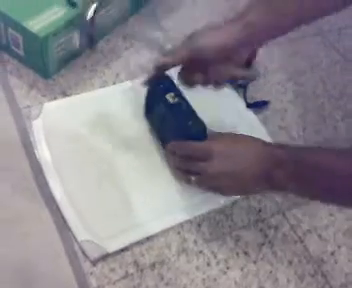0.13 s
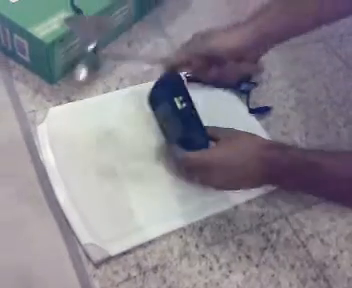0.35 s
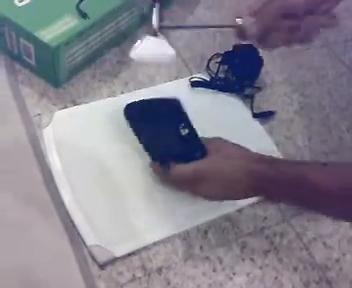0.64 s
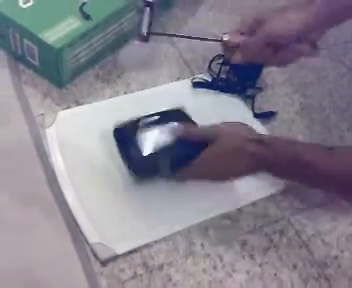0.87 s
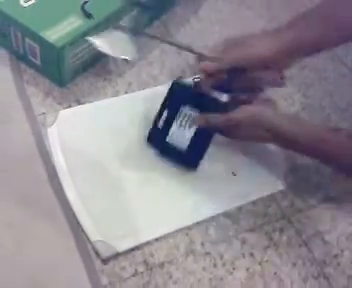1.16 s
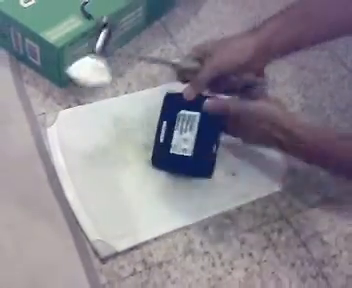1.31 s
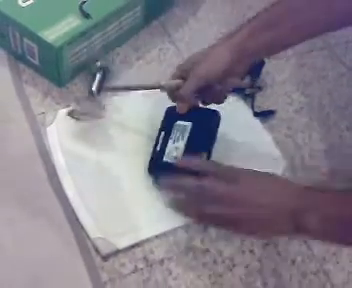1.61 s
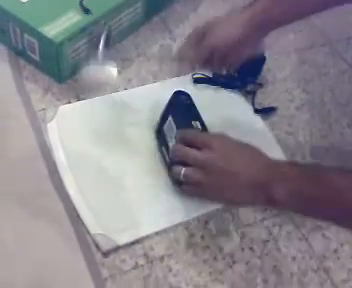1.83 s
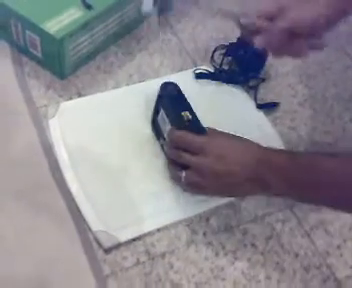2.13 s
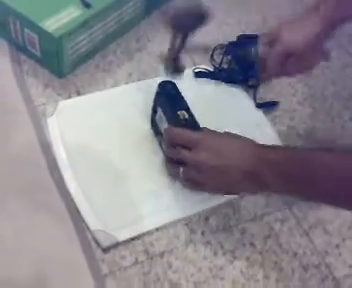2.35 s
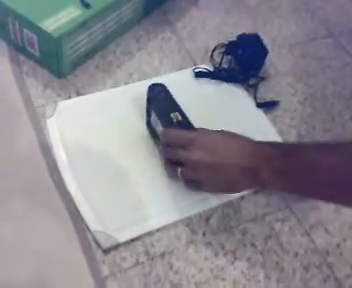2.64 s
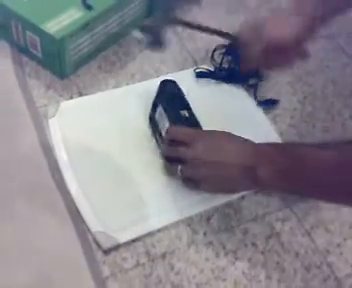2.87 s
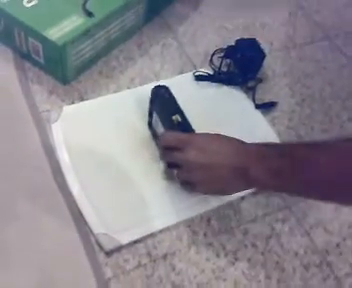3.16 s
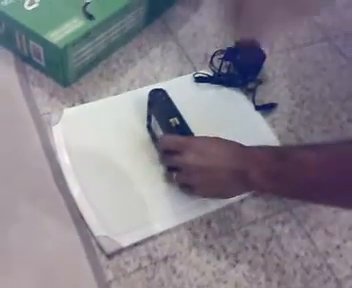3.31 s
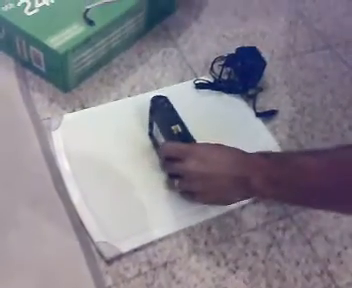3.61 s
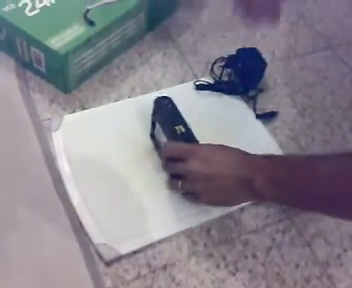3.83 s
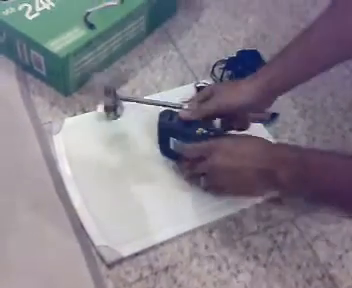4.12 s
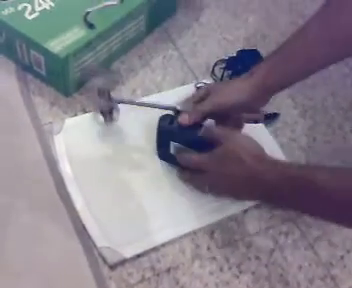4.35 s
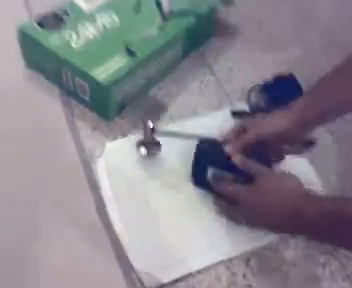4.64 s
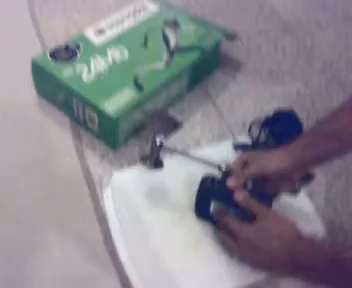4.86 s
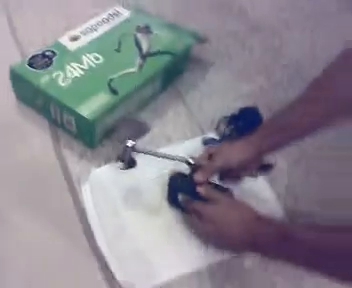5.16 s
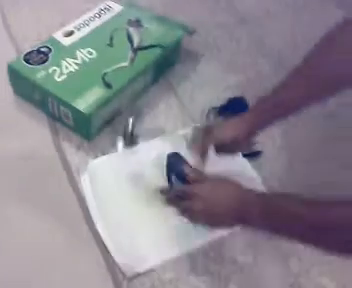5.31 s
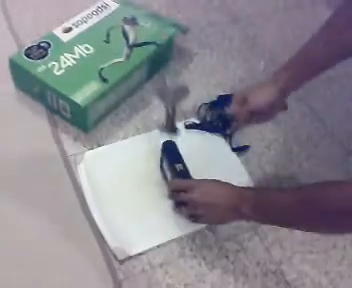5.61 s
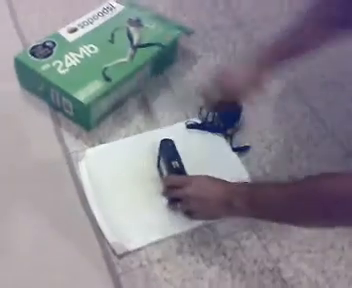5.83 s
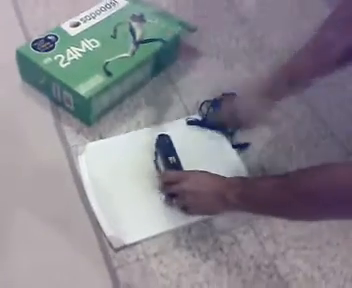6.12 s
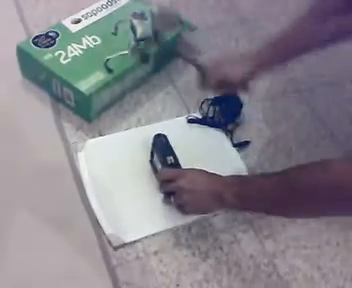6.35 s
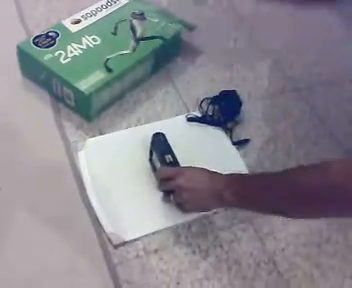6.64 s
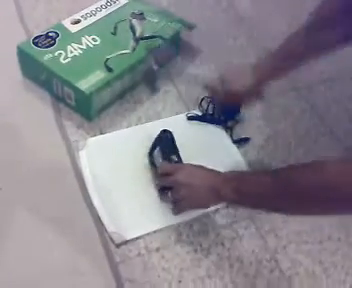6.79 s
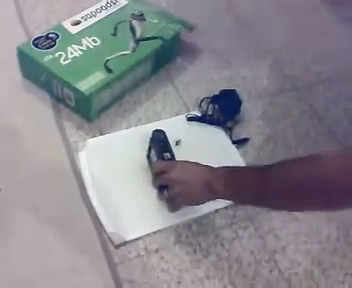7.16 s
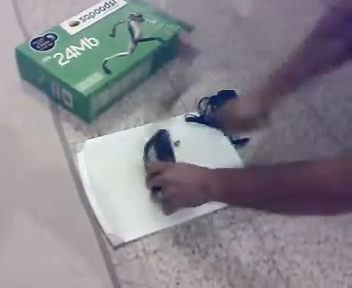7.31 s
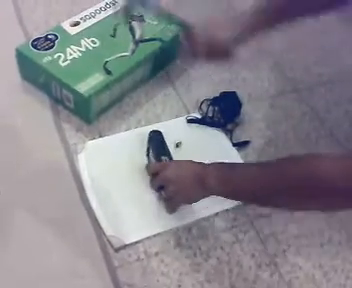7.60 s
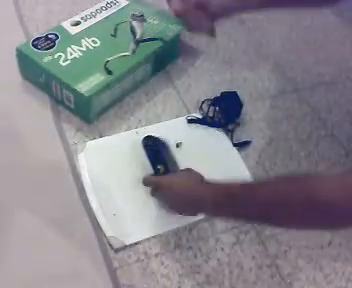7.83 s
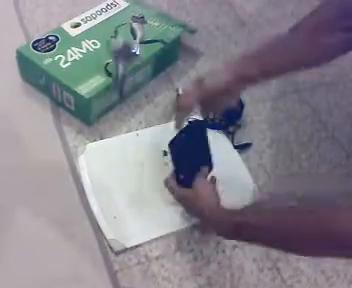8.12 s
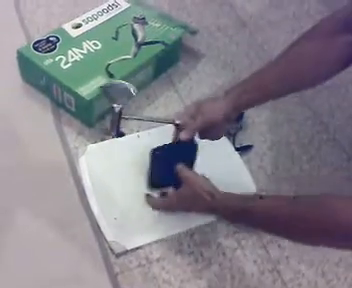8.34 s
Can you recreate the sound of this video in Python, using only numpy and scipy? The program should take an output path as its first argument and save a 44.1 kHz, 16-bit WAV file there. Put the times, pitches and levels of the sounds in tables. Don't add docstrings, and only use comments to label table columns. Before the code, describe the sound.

Hard hammer blows crack a hollow plastic case on a tiled floor, with knocks, ticks and sliding between, in an echoing bare room.

```python
import sys
import numpy as np
from scipy import signal
from scipy.fft import rfft, irfft
from scipy.io import wavfile
from scipy.ndimage import uniform_filter1d

SR = 44100
rng = np.random.default_rng(int(sys.argv[2]) if len(sys.argv) > 2 else 0)


def invert_db(level):
    return 10 ** (np.asarray(level, dtype=float) / 20)


def inscribe(sig):
    pcm = np.round(np.clip(np.atleast_2d(sig).T, -1, 1) * 32767)
    wavfile.write(sys.argv[1], SR, pcm.astype(np.int16))


N = 373527
LEAD = 11025
LOW_RATE = 16000


def evened(x):
    return x / np.sqrt(np.mean(x ** 2) + 1e-20)


def read(points, hz):
    f, value = np.transpose(points)
    return np.interp(np.log(hz + 1), np.log(f + 1), value)


def shaped(colour, grain):
    gain = invert_db(read(colour, np.fft.rfftfreq(len(grain), 1 / SR)))
    return evened(irfft(rfft(grain) * gain, len(grain)))


def causal(db):
    log_gain = np.log(invert_db(np.concatenate([db, db[-2:0:-1]])))
    return np.fft.ifft(np.exp(signal.hilbert(log_gain).conj())).real[:len(db)]


def add(mix, start_s, sound):
    part = mix[LEAD + round(start_s * SR):][:len(sound)]
    part += sound[:len(part)]


def hump(hz, centre_hz, width_hz):
    return 1 / (1 + ((hz - centre_hz) / (width_hz / 2)) ** 2)


def rings(hz, ring_hz, width_hz):
    return sum(share * hump(hz, f, width_hz) for share, f in zip((1, 0.76), ring_hz))


def contact(level_db, thud_db, crack_db, echo_db, chance, body_db, contact_s):
    hz = np.fft.rfftfreq(4096, 1 / SR)
    tilt_db = read([(1000, thud_db), (1300, 0.0036), (3000, 0.015), (4500, crack_db)], hz)
    snap, shell = causal(tilt_db + 1.05 * body_db), causal(tilt_db + body_db)
    t = np.arange(len(chance)) / SR
    attack = np.minimum(t / 0.00081, 1)
    clatter = chance * attack * np.exp(-(t / contact_s) ** 2)
    direct = signal.fftconvolve(clatter, snap)
    direct = invert_db(level_db) * direct / np.linalg.norm(direct)
    return direct, invert_db(level_db + echo_db) * shell / np.linalg.norm(shell)


def play(close, feed, rows, body, thud_db, echo_db, contact_s, lift_db=0):
    for start_s, level_db, crack_db, *ring_hz in rows:
        chance = rng.standard_normal(1600)
        body_db = body(ring_hz, chance)
        direct, spread = contact(level_db + lift_db, thud_db, crack_db, echo_db, chance, body_db, contact_s)
        add(close, start_s, direct)
        add(feed, start_s, spread)


# [freq_hz, density_db_per_hz]
BLOW_COLOUR = [(30, -42.5), (100, -15), (250, -14), (550, -12.5), (950, -5), (1400, -6), (1900, -4.5),
               (2300, -9.5), (3150, -7.5), (3750, -13), (4600, -8.5), (6400, -9.5), (7400, -8),
               (8200, -29.5)]


def crash(ring_hz, chance):
    hz = np.fft.rfftfreq(4096, 1 / SR)
    return read(BLOW_COLOUR, hz) + 10 * np.log10(1 + 2.1 * rings(hz, ring_hz, 220))


def thump(phase):
    pitch_hz, t60_s = 93.6, .25
    t = np.arange(SR // 4) / SR
    boom = np.sin(2 * np.pi * pitch_hz * t)
    boom += 0.95 * np.sin(2 * np.pi * 1.3 * pitch_hz * t + phase)
    boom += 0.55 * np.sin(2 * np.pi * .4 * pitch_hz * t)
    return invert_db(-17 - 60 * t / t60_s) * boom


# [start_s, level_db, crack_db, ring_hz, second_ring_hz]
BLOWS = [
    (-.19, 27, 3, 1550, 3170),
    (3.0677, 21.5, 1.5, 1860, 1930),
    (3.5815, 20.5, 3.5, 1335, 1830),
    (6.421, 20, 1.2, 1804, 1390),
    (6.988, 19.5, 1, 1320, 1940),
    (7.541, 21, 0.3, 3120, 1570),
]


def blows(close, feed):
    play(close, feed, BLOWS, crash, thud_db=-1.8, echo_db=6.34, contact_s=0.0076)
    crush_db_per_s = 1.65
    for start_s, *_ in BLOWS:
        add(close, start_s, invert_db(-crush_db_per_s * start_s) * thump(rng.uniform(0, 2 * np.pi)))


# [freq_hz, width_hz, level_db]
CASE = [(700, 120, -5), (970, 90, 3), (1370, 90, -3), (1620, 90, -5), (1850, 120, -1), (2900, 200, -7),
        (3250, 150, -6), (4700, 300, -9), (6300, 400, -8)]


def hollow(ring_hz, chance):
    hz = np.fft.rfftfreq(4096, 1 / SR)
    modes = sum(invert_db(2 * db + 2 * c) * hump(hz, f, width) for (f, width, db), c in zip(CASE, chance))
    loudest = 7.5 * rings(hz, ring_hz, 61)
    return 10 * np.log10(.1 + modes + loudest) + read([(100, -16.0), (500, -4), (7000, -3)], hz)


# [start_s, level_db, crack_db, ring_hz, second_ring_hz]
KNOCKS = [(.988, -43, -8, 330, 700), (1.1848, -11, -6.5, 963, 1720), (1.8332, -20.5, -7, 1020, 1980),
          (1.9197, -15.5, -8, 960, 1390), (1.948, -16.5, -13, 1974, 2760), (2.1168, -1.5, -9.5, 961, 1390),
          (2.6603, -3.5, -2.5, 1896, 1680), (4.2015, -30.5, -18, 990, 1860), (4.304, -16, 8, 1790, 1400),
          (4.311, -8.5, -4.5, 956, 1640), (4.3185, -9, -13, 984, 1665), (5.0306, -24, -8, 1820, 1220),
          (5.0657, -11, -0.5, 1580, 997), (5.3938, -31, 0, 710, 3180), (8.2545, -31.5, 3, 934, 1800)]


def knocks(close, feed):
    play(close, feed, KNOCKS, hollow, thud_db=.4, echo_db=-5, contact_s=0.0051, lift_db=13)


# [start_s, level_db, crack_db, ring_hz]
TICKS = [(.7348, -41.5, -24, 1900), (1.1483, -21, -2.5, 2800), (1.2076, -18, -12, 1750),
         (1.2407, -8.5, -2, 1770), (1.4271, -20, -13, 1724), (1.4600, -25, -18, 1800),
         (1.4935, -32.5, -5, 1780), (1.5512, -23.5, -13, 1700), (1.5742, -19.5, -11, 1790),
         (1.6232, -19.5, -8, 1780), (1.7065, -26.5, -11, 1720), (1.8584, -26, -1.5, 1930),
         (2.0304, -38, 2, 950), (4.844, -45, -29, 1820), (5.4251, -34.5, -25, 1800),
         (5.4895, -35, -9, 1820), (5.7993, -38, -25, 1750), (5.859, -35.5, 9, 1850), (5.99, -24.5, 2, 1790),
         (8.1943, -35.5, -7, 1940), (8.352, -36, -3.5, 1820), (8.3946, -36.5, 9, 1850),
         (8.4204, -37.5, 18, 1830), (8.4454, -35, 10, 1830), (8.3337, -39, 14, 1400),
         (8.378, -40, -4, 1830)]


def ticks(close, feed):
    play(close, feed, TICKS, hollow, thud_db=-15, echo_db=-4.5, contact_s=0.0071, lift_db=13)


# [start_s, level_db, crack_db, ring_hz]
SCUFFS = [(2.3694, -35, -7.5, 969), (3.9685, -12, -1, 1320), (4.2278, -30.5, -2, 1900),
          (4.2500, -25.5, -19, 970), (4.2750, -24.5, -5, 1020), (4.3894, -28, 4, 970),
          (4.7144, -34.5, -15, 1241), (5.6808, -38, -26, 1000), (5.7150, -38.5, -30, 824),
          (5.7492, -38.5, -10, 810), (5.9397, -12.5, 0.5, 1806), (5.9703, -18, 1.5, 1810)]


def scuffs(close, feed):
    play(close, feed, SCUFFS, hollow, thud_db=-1.1, echo_db=1.3, contact_s=0.0091, lift_db=13)


# [start_s, level_db, crack_db, ring_hz, second_ring_hz]
SHARD = [
    (7.9837, -1, -6.5, 1850, 1480),
]


def shard(close, feed):
    play(close, feed, SHARD, crash, thud_db=-6.5, echo_db=-4, contact_s=0.0053)


# [freq_hz, level_db, t60_s]
STEEL = [(615, -11, .08), (721, -11, .08), (1090, -10, .08), (1320, -7, .07), (3250, -10, .03),
         (4150, -1, .02), (4760, -2, .04), (6300, -2.5, .03)]


def steel(close, feed):
    t = np.arange(SR // 2) / SR
    song = sum(invert_db(db - 60 * t / t60_s) * np.sin(2 * np.pi * hz * t) for hz, db, t60_s in STEEL)
    for mix in (close, feed):
        add(mix, 3.968, invert_db(-23) * song)


# [start_s, length_s, level_db]
SLIDE = [(0.944, 0.11, -55.5), (1.2, 0.49, -51), (1.82, 0.35, -48.5), (2.4, 0.41, -53),
         (2.751, 0.41, -45.5), (4.14, 0.47, -45), (4.41, 0.58, -49.5), (5.346, 0.36, -51.5),
         (5.57, .45, -48.5), (6.079, 0.52, -51.5), (8.066, .35, -57)]
# [freq_hz, density_db_per_hz]
SLIDE_COLOUR = [(88, -24), (150, -4.5), (471, -5), (575, 1.5), (1610, -2), (1840, 0.5), (3500, -32),
                (3680, -18.5), (6370, -13.5), (7900, -68), (10300, -61), (17400, -120)]


def slide():
    slips_per_s, peak_share = 3000, 0.29
    size = invert_db(2.6 * np.minimum(rng.exponential(1, N), 3))
    slips = rng.standard_normal(N) * size * (rng.random(N) < slips_per_s / SR)
    clumps = invert_db(1.4 * evened(uniform_filter1d(rng.standard_normal(N), size=1200)))
    t = np.arange(N) / SR
    level = 0
    for start_s, length_s, level_db in SLIDE:
        corners_s = [start_s, start_s + peak_share * length_s, start_s + length_s]
        level = level + invert_db(level_db) * np.interp(t, corners_s, [0, 1, 0])
    return level * clumps * shaped(SLIDE_COLOUR, slips)


# [freq_hz, t60_s]
ROOM = [(120, 0.64), (400, 0.61), (1000, 0.65), (2000, 0.64), (4000, 0.55), (7500, 0.49)]
# [freq_hz, gain_db]
HOUSING = [(200, -1), (1000, -1), (1900, 1), (3200, 0.5), (5000, -2), (7500, -1.5)]


def room(x, count=3):
    turn, wet = np.arange(len(x)) / SR * 1.3, 0
    at = np.arange(300, SR - 22, 22)
    for k in range(count):
        taps = np.zeros(SR)
        taps[at + rng.integers(0, 22, len(at))] = rng.choice([-1., 1.], len(at))
        hz, t, z = signal.stft(taps, SR, nperseg=256)
        decay = invert_db(-60 * t / read(ROOM, hz)[:, None])
        tail = signal.istft(z * decay, SR, nperseg=256)[1]
        tail *= np.minimum(np.arange(len(tail)) / SR / 0.012, 1)
        share = np.cos(np.pi * (turn - k / count))
        wet = wet + signal.fftconvolve(x * share, tail / np.linalg.norm(tail))[:len(x)]
    housing = causal(read(HOUSING, np.fft.rfftfreq(2048, 1 / SR)))
    return signal.fftconvolve(wet, housing)[:len(x)]


# [centre_s, half_length_s, swell_db]
PASSES = [
    (2.5, 0.97, 6),
    (4.1, .4, 1),
    (5.9, 0.62, 8),
]


def traffic():
    t = np.arange(N) / SR
    colour = [(15, -5.5), (60, -1.5), (150, -6.0), (300, 0.5), (450, -14), (900, -36.5)]
    dull = shaped(colour, rng.standard_normal(N))
    swell_db = sum(db * np.exp(-((t - s) / half_s) ** 2) for s, half_s, db in PASSES)
    return invert_db(-60 + swell_db) * dull


# [start_s, length_s, pitch_hz, level_db]
DRONES = [
    (.1, 1.9, 88, -60.5),
    (2.0, 0.95, 86, -62.5),
    (3.797, 2.4, 92, -62),
    (5.297, 1.1, 66, -58.5),
]


def drones():
    t = np.arange(N) / SR
    waver = 1 + 0.48 * evened(uniform_filter1d(rng.standard_normal(N), size=6000))
    out = 0
    for start_s, length_s, pitch_hz, level_db in DRONES:
        arch = np.sin(np.pi * np.clip((t - start_s) / length_s, 0, 1)).clip(0)
        out = out + invert_db(level_db) * np.sqrt(arch) * waver * np.sin(2 * np.pi * pitch_hz * t)
    return out


# [freq_hz, density_db_per_hz]
HUSH = [(250, -29.5), (400, -2.5), (1400, -8), (1750, -3.5), (2300, -11), (3500, -18.5), (5000, -20),
        (7000, -23.5), (7900, -29)]


def hush():
    return invert_db(-60.5) * shaped(HUSH, rng.standard_normal(N))


# [pitch_hz, rms_level_db]
WHINE = [(1685, -76), (3225, -79), (3515, -76), (3731, -89), (4102, -85), (4393, -87), (4980, -85),
         (5276, -81), (5566, -85), (6153, -87), (6444, -92), (7031, -90), (7327, -91)]


def whine():
    t = np.arange(N) / SR
    return sum(invert_db(db + 6) * np.sin(2 * np.pi * (hz * t + rng.random())) for hz, db in WHINE)


def squeeze(low, noise_db=-11.5):
    z = signal.stft(low, nperseg=256)[2]
    band = np.sqrt(uniform_filter1d(abs(z) ** 2, size=8, axis=0))
    z = z + invert_db(noise_db) * band * np.exp(2j * np.pi * rng.random(z.shape))
    return signal.istft(z, nperseg=256)[1][:len(low)]


# [freq_hz, gain_db]
STRETCH = [(7000, 0), (7400, -3), (7650, -14), (7800, -32), (8000, -50), (8200, -42), (8400, -26),
           (8800, -26), (9000, -40), (9300, -90)]


def stretch(low):
    size = (len(low) // 160 + 20) * 160
    band = np.tile(np.fft.fft(low, size), 2)[:size * 441 // 320 + 1]
    hz = np.arange(len(band)) * LOW_RATE / size
    return irfft(band * invert_db(read(STRETCH, hz)), size * 441 // 160)[:N] * SR / LOW_RATE


def scene():
    close, feed = np.zeros((2, LEAD + N))
    for source in (blows, knocks, ticks, scuffs, shard, steel):
        source(close, feed)
    add(close, 0, invert_db(-2) * slide())
    return (close + room(feed))[None, LEAD:] + traffic() + drones()


def low_pass(x):
    return signal.sosfilt(signal.butter(12, 16500, fs=SR, output="sos"), x)


def record(dry):
    x = dry[0] + hush() + whine()
    x += 0.016 * np.clip(x, -1, 1) ** 2
    low = squeeze(np.clip(signal.resample_poly(x, 160, 441), -.62, .62))
    full = np.clip(stretch(low), -.74, .74)
    edge = signal.firwin(255, 15800, window=("kaiser", 8), fs=SR)
    return low_pass(signal.oaconvolve(full, edge, "same")[None])


dry = scene()
out = record(dry)
inscribe(out)
```